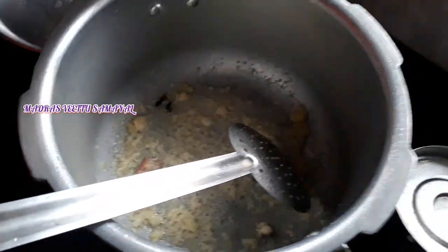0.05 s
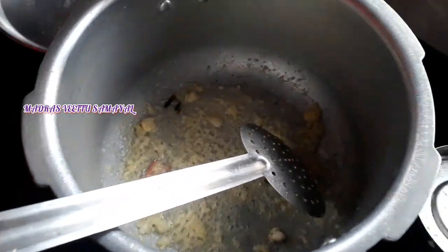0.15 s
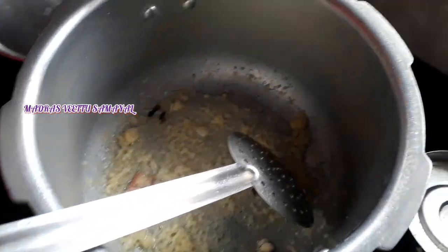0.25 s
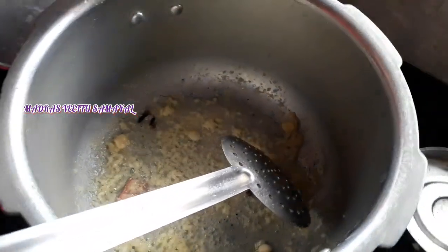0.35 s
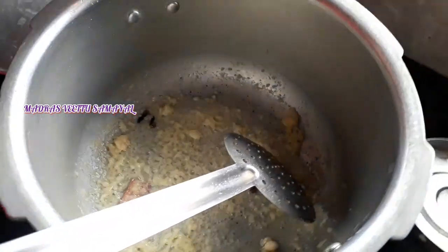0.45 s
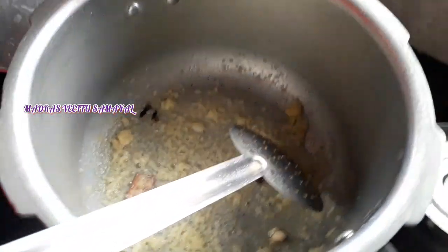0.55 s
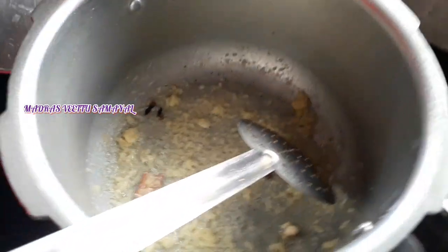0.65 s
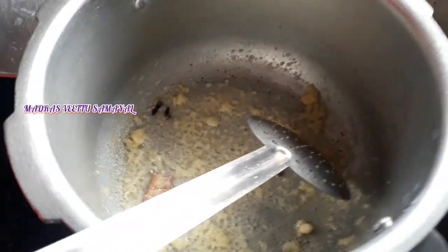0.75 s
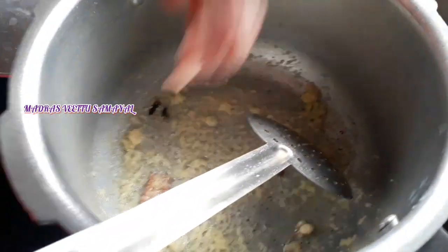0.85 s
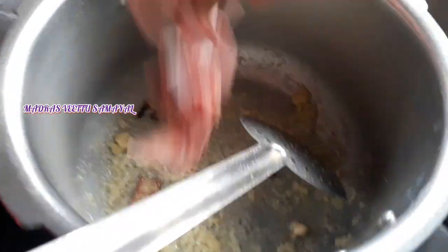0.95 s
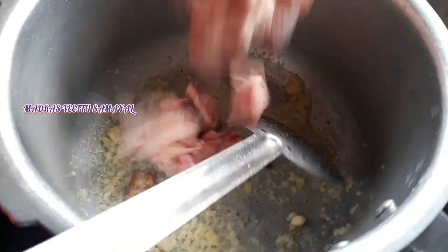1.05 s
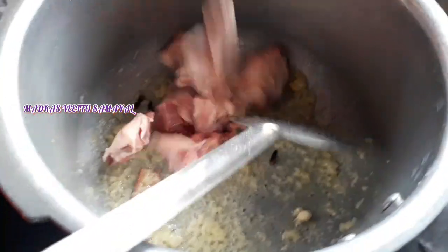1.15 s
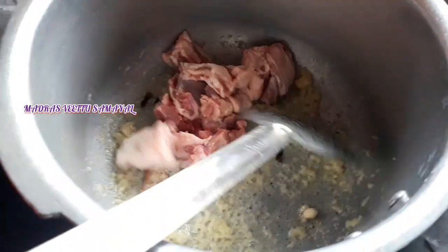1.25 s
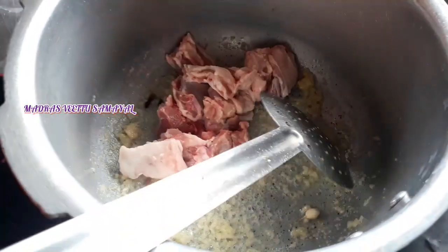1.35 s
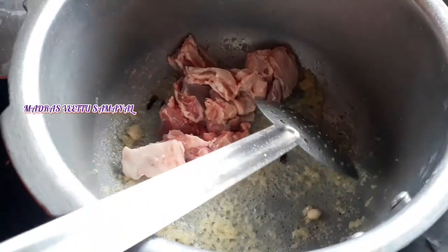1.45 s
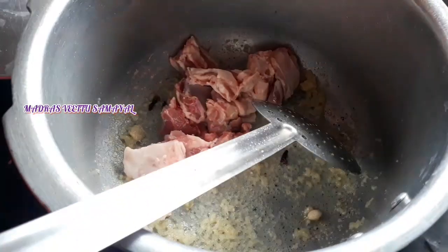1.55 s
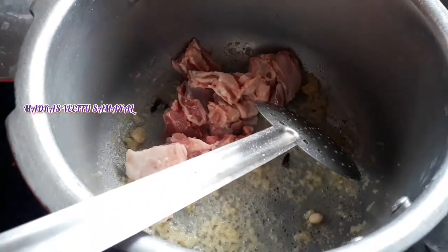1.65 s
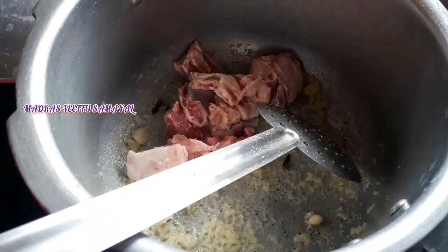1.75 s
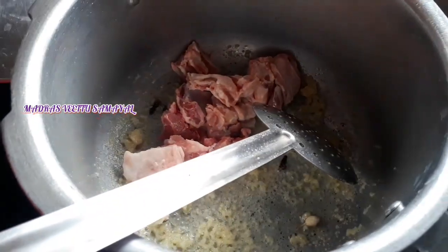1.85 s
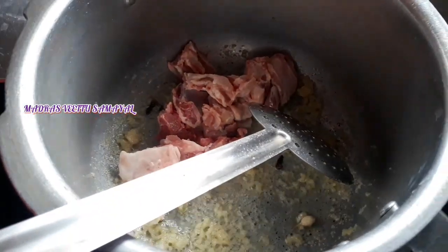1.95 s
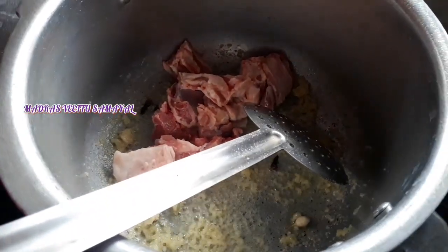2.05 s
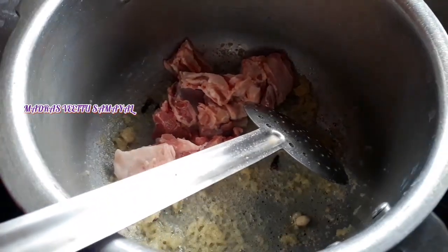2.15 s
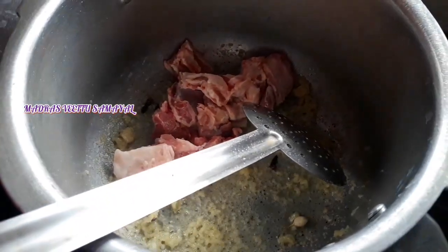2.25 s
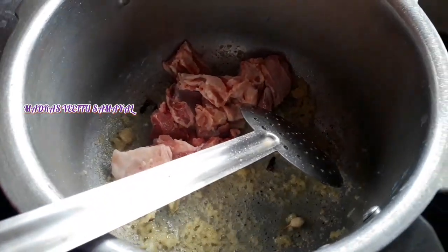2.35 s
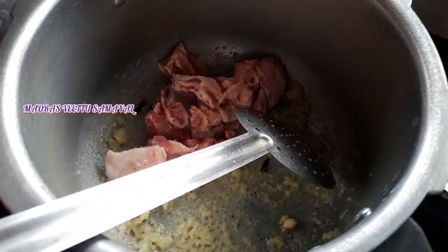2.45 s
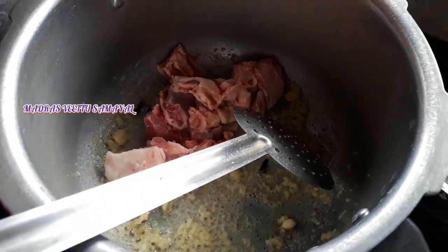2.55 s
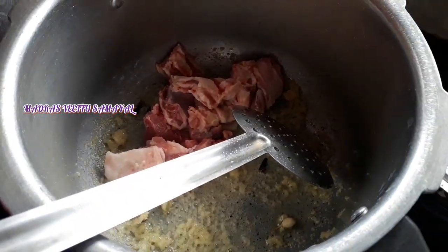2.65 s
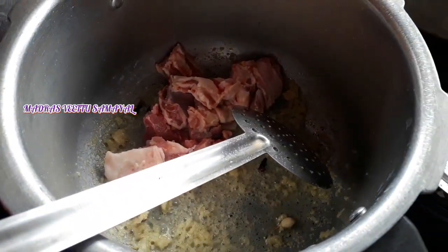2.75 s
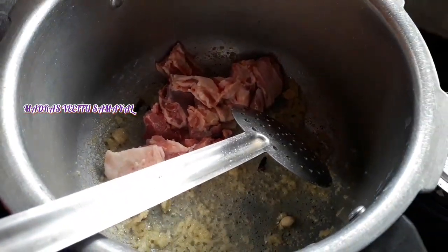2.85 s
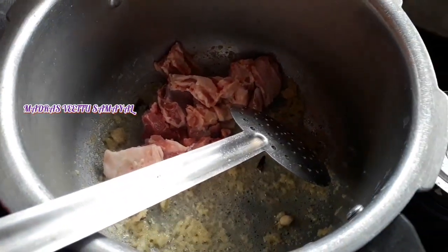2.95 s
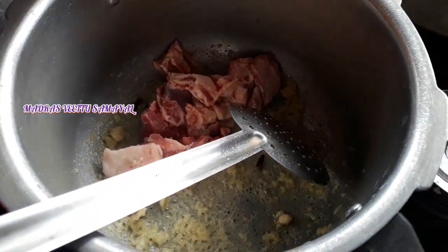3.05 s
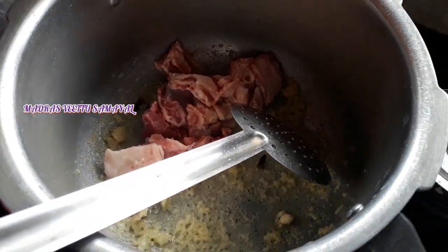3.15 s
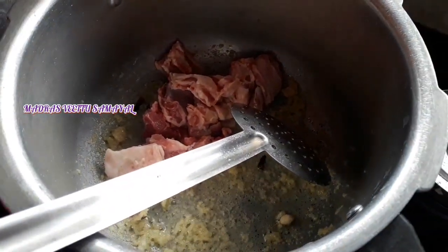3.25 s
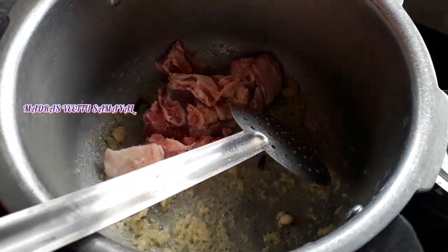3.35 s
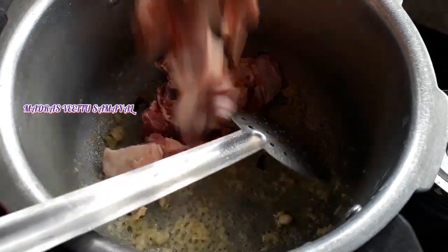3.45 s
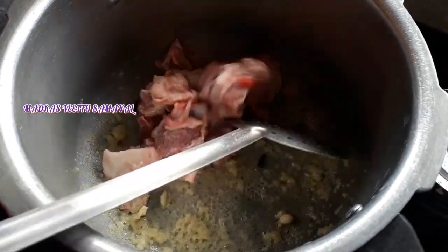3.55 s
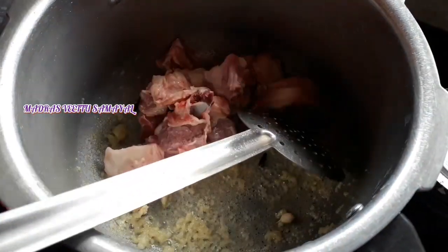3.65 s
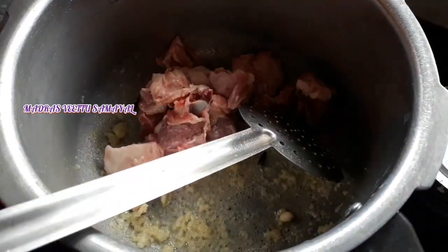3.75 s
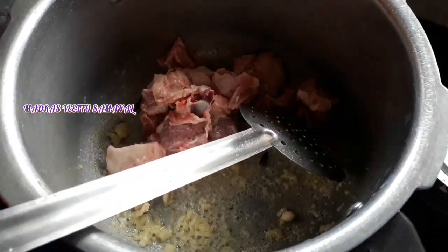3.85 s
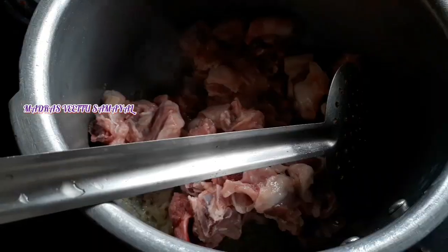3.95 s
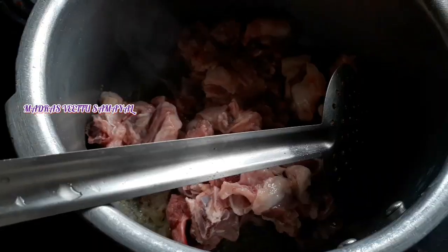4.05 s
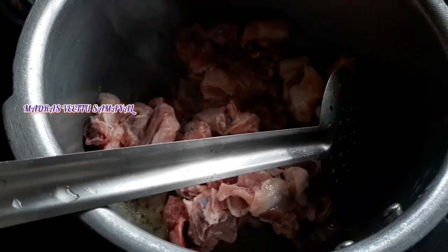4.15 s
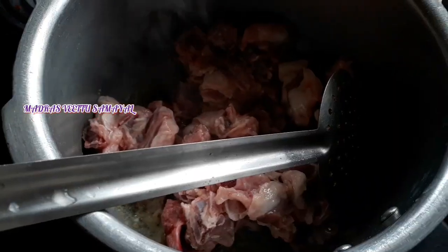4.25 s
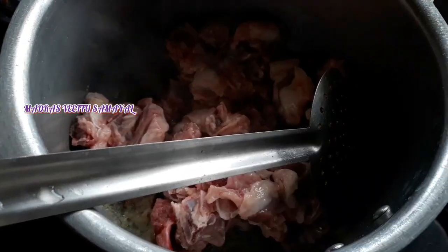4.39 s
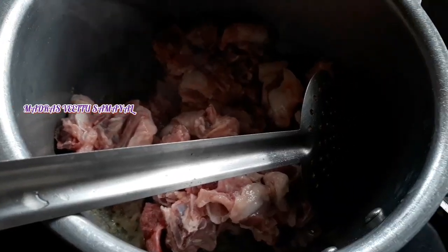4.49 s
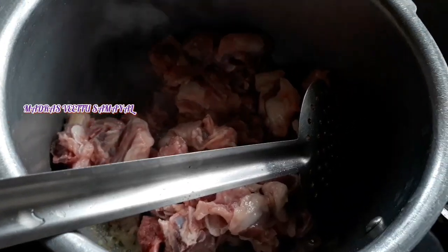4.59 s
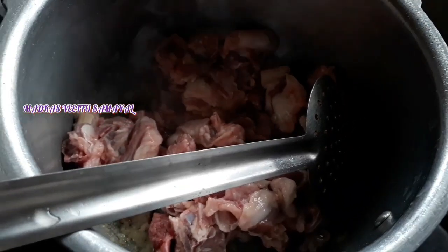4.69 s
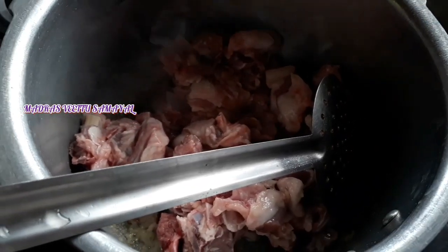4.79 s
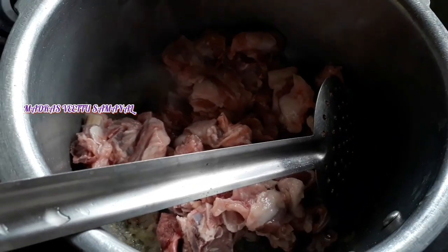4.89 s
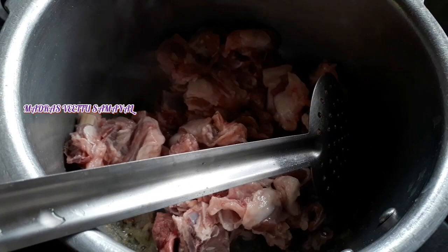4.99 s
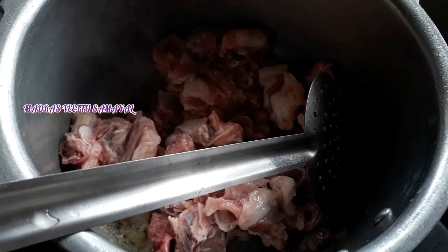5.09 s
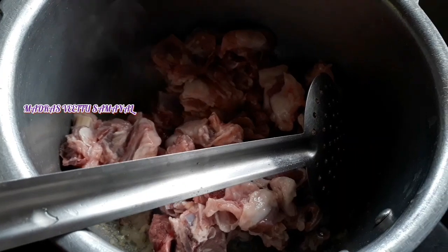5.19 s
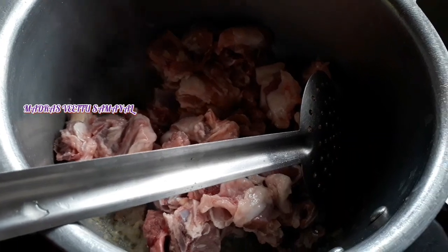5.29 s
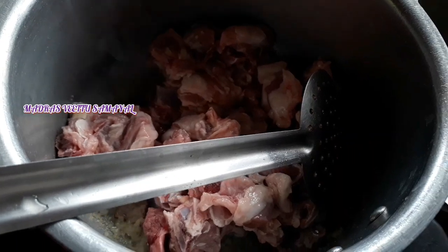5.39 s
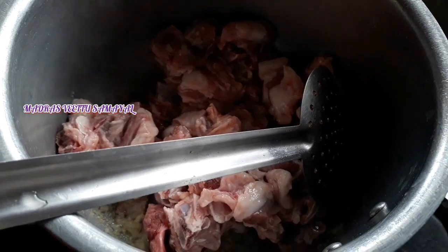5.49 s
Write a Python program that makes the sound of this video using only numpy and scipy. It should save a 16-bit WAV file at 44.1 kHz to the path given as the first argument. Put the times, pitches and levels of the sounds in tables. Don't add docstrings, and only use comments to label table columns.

```python
import sys
import numpy as np
from scipy import signal
from scipy.fft import rfft, irfft, next_fast_len
from scipy.io import wavfile
from scipy.ndimage import uniform_filter1d

SR = 44100
rng = np.random.default_rng(int(sys.argv[2]) if len(sys.argv) > 2 else 0)


def persist_wave(psi):
    counts = np.round(np.clip(psi, -1, 1) * 32767).astype(np.int16)
    wavfile.write(sys.argv[1], SR, np.atleast_2d(counts).T)


def volts_from_decibels(level):
    exponent = np.asarray(level, float) / 20
    return 10 ** exponent


N = 243599
SPAN = next_fast_len(N)
TIME = np.arange(SPAN) / SR
FREQ = np.maximum(np.fft.rfftfreq(SPAN, 1 / SR), 1)
TOP_HZ = 15740


def sizzle():
    # start_s, fade_s, tilt_db_per_octave, big_bubbles_db
    stages = [
        (0, .01, -1.7, -1.5),
        (1.0, 0.03, -0.03, 0.3),
        (3.89, 0.0051, 0.07, -1.5),
    ]
    # pitch_hz, level_db (per Hz)
    simmer = [(410, -40), (700, -9), (797, -7.5), (932, -7.5), (1760, -6.5), (1910, -6), (2140, -9),
              (2710, -6.5), (4560, -0.5), (5260, -2), (7380, -4.5), (8630, -8), (11900, -3.5), (15700, -10)]
    sear = [(410, -46), (700, -17.5), (982, -21), (1160, -12), (1550, -14), (1830, -9), (2570, -6.5),
            (3010, -4), (4560, -2), (5190, -3), (7010, -8), (8300, -21.5), (11200, -10), (13400, -12),
            (15700, -12)]
    last_colour = [(410, -38), (700, -11.5), (908, -17), (1120, -5), (1260, -9.5), (1960, -4.5), (2120, -8.5),
                   (2380, -4.5), (3130, -10.5), (3700, -6.5), (4560, -10), (6830, -13.5), (8630, -18),
                   (13100, -15), (15700, -15)]
    # right_notch_depth_db, left_minus_right_db, opposed_sound (0-1),
    # left_top_loss_db, right_top_loss_db
    facing = [
        (21, 1.5, 0.7, 7, 0),
        (2, 1, 0.97, 10, -1.5),
        (25.5, 0, 0.06, 10, 12),
    ]
    # pitch_hz, width_hz, lift_db
    pot_resonances = [(551, 285, 9), (1120, 67, 2), (1875, 55, 3.5), (3010, 100, 3), (3610, 120, 2),
                      (4060, 59, 2.5), (5250, 170, 0.5)]
    # time_s, level_db
    boil = [(0, -30), (.965, -32), (.99, -20.5), (1.1, -23.5), (1.18, -16.5), (1.3, -15), (1.5, -16),
            (1.95, -14.5), (2.45, -15), (3.0, -16), (3.45, -16.5), (3.88, -18.5), (3.9, -18.5), (5.52, -17)]
    # start_s, lift_db, wetness (0-1)
    flares = [
        (.988, -2.5, 1),
        (1.1, 10, 1),
        (3.545, 1.5, 0),
        (5.335, 4, 0.1),
    ]
    flare_rise_s, flare_fall_s, dry_out_s = 0.016, 0.023, 0.23

    begun = [np.clip((TIME - start_s) / fade_s + 0.5, 0, 1) for start_s, fade_s, *_ in stages[1:]]
    begun[1] = np.maximum(begun[1], 0.1 * surge(3.55, 0.036, np.inf))
    shares = [1 - begun[0], begun[0] - begun[1], begun[1]]

    flare_db = sum(lift_db * surge(s, flare_rise_s, flare_fall_s) for s, lift_db, _ in flares)
    wetness = sum(wet * surge(s, flare_rise_s, dry_out_s) for s, _, wet in flares)
    tilt_db = 2.5 - 1.08 * wetness
    big_db = 2.5 + 1.7 * flare_db
    for share, stage in zip(shares, stages):
        tilt_db = tilt_db + share * stage[2]
        big_db = big_db + share * stage[3]
    boil_db = np.interp(TIME, *np.transpose(boil))
    fizz = rfft(bubbles(tilt_db, big_db) * volts_from_decibels(boil_db + flare_db))

    resonance_db = sum(lift_db / (1 + (2 * (FREQ - hz) / width_hz) ** 2) for hz, width_hz, lift_db in pot_resonances)
    out = 0
    for share, colour, face in zip(shares, (simmer, sear, last_colour), facing):
        notch_db, lean_db, opposed, *top_db = face
        bass_db = 6.6 * np.minimum(np.log2(FREQ / colour[1][0]), 0)
        gain = volts_from_decibels(on_log(colour[1:-1]) + resonance_db + bass_db)
        gain = gain / np.sqrt(2 * np.mean((gain * (FREQ > 2500)) ** 2))
        notch_db = notch_db / (1 + ((FREQ - 8700) / 800) ** 2)
        ports = volts_from_decibels(np.array([lean_db / 2 + 0 * FREQ, -lean_db / 2 - notch_db]))
        ports = ports / np.sqrt(np.mean(ports ** 2, 0)) * volts_from_decibels(-0.25 * notch_db)
        top_loss = volts_from_decibels(-np.array(top_db)[:, None] * (FREQ / TOP_HZ) ** 8)
        heard = irfft(at_ports(*fizz, opposed) * gain * ports * top_loss, SPAN)
        out = out + np.sqrt(share) * heard
    return out


def bubbles(tilt_db, big_db):
    swell = walk(7.2)
    tiny = popping(5000, 2.1, 0.0015)
    fine = popping(3000, 2.1, 0.0025)
    coarse = popping(500, 2.8, 0.008)
    crackle = 1 + 0.06 * popping(150, 2.0, 0.0003)
    near = walk(2.26)
    out = 0
    for octave in np.arange(-4, 2.1, 2 / 3):
        band = np.clip(1 - np.abs(np.log2(FREQ / 4000) - octave) * 1.5, 0, 1)
        big = 1 / (1 + 2 ** (3 * (octave + 1.66)))
        near = 0.6 * near + 1.1 * walk(8)
        unrest_db = 0.12 * swell + 0.5 * near + 0.94 * walk(24.92)
        size_db = tilt_db * octave + big * big_db + unrest_db
        fizz = irfft(np.sqrt(band) * rfft(rng.standard_normal((2, SPAN))), SPAN)
        small = crackle * (fine if octave < 1 else tiny)
        out = out + fizz * volts_from_decibels(size_db) * (big * coarse + (1 - big) * small)
    return out


def popping(rate_hz, spread_db, burst_s):
    start, strength = rng.random((2, SPAN))
    power = (start < rate_hz / SR) * volts_from_decibels(-2 * spread_db * np.log(strength + 0.002))
    power = signal.lfilter([1], [1, -np.exp(-1 / (burst_s * SR))], power)
    return np.sqrt(power / power.mean())


def spits():
    # start_s, peak_db, pitch_hz
    droplets = [(0.336, -29, 3130), (0.9888, -7.5, 4070), (1.0414, -26, 3780), (1.0734, -10, 5230),
                (1.079, -19, 2000), (1.1617, -5, 5270), (1.1974, -15, 3520), (1.782, -13, 5530),
                (2.4314, -8, 3520), (3.112, -10, 4060), (3.2154, -11, 3370), (3.233, -8, 5200),
                (3.477, -13, 5330), (3.4834, -10, 5250), (3.5314, -22, 4830), (3.6553, -16, 3000),
                (4.115, -11, 2370), (5.2573, -17, 2470), (5.334, -11, 4400), (5.3674, -21, 4180)]
    out = np.zeros((2, SPAN + SR))
    t = np.arange(200) / SR
    shape = t / 0.0004 * np.exp(1 - t / 0.0004)
    for s, peak_db, hz in droplets:
        chance = rng.standard_normal((2, 202))
        tone = np.sin(2 * np.pi * hz * t + 0.4 * chance[:, :1])
        hiss = 0.5 * np.diff(chance[:, 1:])
        start = int(s * SR)
        out[:, start:start + 200] += volts_from_decibels(peak_db - 2 + 2 * chance[:, 1:2]) * (tone + hiss) * shape
    return out[:, :SPAN]


def meat_drops():
    # pitch_hz, level_db, t60_s
    pot_modes = [(486, -13, 0.031), (536, 2, 0.02), (614, 3.5, 0.037), (790, -2.5, 0.028), (1097, -6, 0.02),
                 (1300, 4.5, 0.012), (1794, 1, 0.0094)]
    # start_s, peak_db, splash_db, ring_share (of t60)
    drops = [(.977, -23.5, -14, 0.84), (.9845, -12.5, -20, 0.75), (.990, -12.5, -13, 0.27),
             (1.053, -23, -19, 0.68), (1.065, -20.5, -23, 1), (3.524, -20, -10, 1), (3.5315, -3, -3, 0.48),
             (3.538, -9, -9, 0.75), (3.555, -13, -19, 0.68), (3.573, -18, -20, 0.38),
             (3.581, -31, -20, 0.55), (3.696, -15, -17, 0.3), (5.085, -40, -16, 0.42),
             (5.246, -17, -26, 0.47), (5.257, -33, -20, 0.5), (5.337, -15, -21, 0.54),
             (5.434, -18, -18, 0.61)]
    return blows(drops, (17.2, 0.61), pot_modes, push_s=0.001, splash_s=0.0027, splash_hz=5000, rattle=1.0)


def ladle():
    # pitch_hz, level_db, t60_s
    ladle_modes = [(500, -8.5, 0.021), (1020, -19, 0.078), (1330, -8, 0.055), (1660, 3.5, 0.018),
                   (1750, -14, 0.14), (1900, -13.5, 0.32), (2007, 8.5, 0.041), (2160, -7, 0.085),
                   (2440, -14, 0.067), (2912, -30, .1), (4400, -2, 0.036), (5560, -22, 0.043)]
    rim_modes = [(1880, 0, 0.15), (3360, -46, 0.043), (5010, 6, 0.24), (5030, 2, 0.072), (5440, -13, .05),
                 (5660, -11, .06)]
    # start_s, peak_db, splash_db, ring_share (of t60)
    knocks = [
        (.9907, -15.5, -5.5, 1),
        (1.1106, 1.5, -14, 0.8),
        (1.122, -10, -16, 0.8),
        (5.3343, -8, 0.5, 0.6),
    ]
    ticks = [
        (3.5374, -6, -10, 1),
        (3.5872, -13, -16, 0.81),
        (3.6062, -12, -6, 0.8),
    ]
    body = blows(knocks, (-3.4, -0.19), ladle_modes, push_s=0.00033, splash_s=0.0091, splash_hz=5900, rattle=0.79)
    rim = blows(ticks, (0, 0), rim_modes, push_s=0.0002, splash_s=0.0047, splash_hz=7900, rattle=0.4)
    return body + rim


def counter_bang():
    # pitch_hz, level_db, t60_s
    counter_modes = [(100, -16.5, 0.34), (180.4, -10, 0.56), (195, 3, 0.14), (294, 3, .3), (316.6, -3, 0.3),
                     (420, -11, 0.3), (537, 0.5, 0.1), (592, 6.5, 0.077), (625, -6, 0.24), (678, -10, 0.38),
                     (773, -2.5, 0.11), (940, -15, .13), (1140, -25, .12), (1470, -4, 0.043)]
    # start_s, peak_db, splash_db, ring_share (of t60)
    bangs = [
        (4.6312, 0.5, -14, 0.9),
        (4.694, -9, -20, 0.6),
        (4.793, -18, -30, 0.74),
    ]
    bang = blows(bangs, (1.4, -0.35), counter_modes, push_s=0.00087, splash_s=0.074, splash_hz=2400, rattle=0.46)
    left, right = bang * volts_from_decibels(np.array([[1.0], [-1.0]]))
    lag_s = 0.00031
    return np.array([left, np.interp(TIME - lag_s, TIME, right)])


def hand_bumps():
    # pitch_hz, level_db, t60_s
    grip_modes = [(93.5, -2, 0.047), (132, 0, 0.059), (245, 2.3, 0.033)]
    # start_s, peak_db, splash_db, ring_share (of t60)
    bumps = [
        (0.14, -37, 14, 0.42),
        (4.259, -34, 4, 0.9),
        (5.045, -22.5, -2, 0.82),
        (5.282, -25.5, 1, 1),
    ]
    return blows(bumps, (0, 0), grip_modes, push_s=0.0015, splash_s=0.011, splash_hz=300, rattle=0.46)


def blows(events, bright, modes, push_s, splash_s, splash_hz, rattle):
    count = SR // 2
    out = np.zeros((2, SPAN + SR))
    hz, db, t60 = np.transpose(modes)[:, :, None]
    t = np.arange(count) / SR
    push = 1 - np.exp(-t / push_s)
    apart = np.minimum(hz / 1500, 1.3)
    splash_filter = signal.butter(2, (splash_hz / 8, splash_hz), "band", fs=SR)
    for s, peak_db, splash_db, share in events:
        bright_db = bright[0] + bright[1] * peak_db
        chance = rng.standard_normal((4, len(modes), 1))
        noise = rng.standard_normal((2, count))
        knots = rng.standard_normal((2, len(modes), 81))
        drift, waver = (np.array([np.interp(t * 80, np.arange(81), k - k[0]) for k in c]) for c in knots)
        strike_db = db + bright_db * np.log2(hz / hz[0]) + chance[0]
        fade = volts_from_decibels(strike_db + rattle * waver - 60 * t / (t60 * share))
        phase = 2 * np.pi * hz * (1 + 0.0038 * chance[1]) * t + rattle * drift
        ring = []
        for port in range(2):
            offset = apart * chance[2 + port] / 2 * (1 + 60 * t)
            ring.append((fade * np.sin(phase + offset)).sum(0))
        ring = np.array(ring) * push
        splash = signal.lfilter(*splash_filter, noise)
        splash = splash / splash.std() * np.exp(-t / (splash_s * share)) * push
        start = int(s * SR)
        out[:, start:start + count] += volts_from_decibels(peak_db) * (ring / np.abs(ring).max() + volts_from_decibels(splash_db) * splash)
    return out[:, :SPAN]


def room(x):
    tail = rng.standard_normal((2, SPAN)) * volts_from_decibels(-60 * TIME / 0.35)
    tail = tail * (1 - np.exp(-TIME / 0.0086))
    tail = at_ports(*rfft(tail / np.sqrt((tail ** 2).sum(1, keepdims=True))))
    tail = tail / (1 + FREQ / 2500) / (1 + (120 / FREQ) ** 2)
    return volts_from_decibels(-1.5) * irfft(rfft(x.mean(0)) * tail, SPAN)


def kitchen():
    # pitch_hz, level_db (per Hz)
    rumble_colour = [(12, -59), (20, -47), (76, -6.5), (113, -10.5), (182, -1.5), (257, -10.5), (290, -2),
                     (401, -11.5), (437, -4), (510, -13.5), (1200, -36), (1560, -52), (2640, -120)]
    # start_s, lift_db
    shakes = [
        (1.03, 13),
        (3.5, 5),
        (4.64, 17),
        (5.0, 4),
    ]
    hum = irfft(at_ports(*rfft(rng.standard_normal((2, SPAN)))) * volts_from_decibels(on_log(rumble_colour)), SPAN)
    shake_db = sum(lift_db * surge(s, 0.04, 0.1) for s, lift_db in shakes)
    flutter_db = 1.5 * walk(7.9)
    return hum / hum.std() * volts_from_decibels(-45 + shake_db + flutter_db)


def at_ports(a, b, opposed=1):
    # pitch_hz, left_minus_right_db, likeness (-1 to 1)
    port_pair = [(40, -5, 0.87), (130, 1, 0.99), (300, .5, 0.98), (724, -0.5, 1), (1240, 0, 0.24),
                 (2320, -2, 0.27), (3450, -4.5, 0.15), (4560, -4, -0.79), (5200, -1.5, 0.22),
                 (6440, 7, -0.48), (6940, 5.5, -0.037), (12300, 2.5, 0.05), (15800, 3.5, -0.31)]
    like = np.clip(on_log(port_pair, column=2), -1, 1)
    like = np.where(like < 0, like * np.clip(opposed, 0, 1), like)
    lean = volts_from_decibels(on_log(port_pair) / 2)
    mid = a * np.sqrt(1 + like)
    side = b * np.sqrt(1 - like)
    return np.array([(mid + side) * lean, (mid - side) / lean])


def surge(s, rise_s, fall_s):
    since = np.maximum(TIME - s, 0)
    return (1 - np.exp(-since / rise_s)) * np.exp(-since / fall_s)


def walk(rate_hz):
    hold = int(SR / rate_hz)
    held = np.repeat(rng.standard_normal(SPAN // hold + 1), hold)
    return uniform_filter1d(uniform_filter1d(held, hold), hold)[:SPAN]


def on_log(table, column=1):
    table = np.array(table, float)
    return np.interp(np.log(FREQ), np.log(table[:, 0]), table[:, column])


def scene():
    knocks, meat, bang = ladle(), meat_drops(), counter_bang()
    echo = room(volts_from_decibels(-4) * knocks + meat + volts_from_decibels(0.5) * bang)
    return (sizzle() + spits() + meat + knocks + bang + hand_bumps() + echo + kitchen())[:, :N]


def roll_off(x):
    return signal.sosfilt(signal.butter(12, 15850, fs=SR, output="sos"), x)


def record(dry):
    heard = signal.lfilter(*signal.butter(1, 50, "high", fs=SR), dry)
    heard = np.clip(heard, -1, 1)
    mix = irfft(rfft(heard, SPAN) * (FREQ < TOP_HZ), SPAN)[:, :N]
    return roll_off(mix)


dry = scene()
out = record(dry)
persist_wave(out)
```